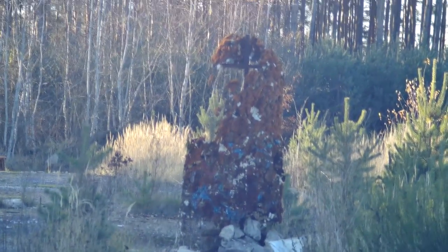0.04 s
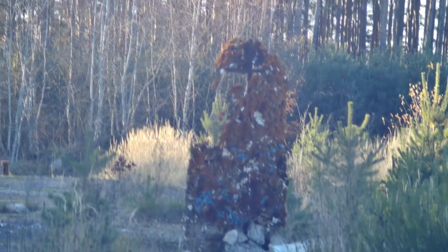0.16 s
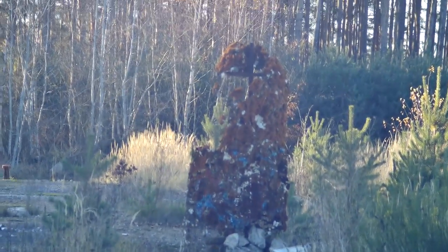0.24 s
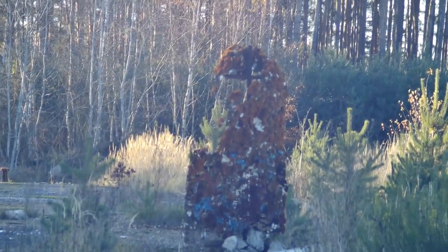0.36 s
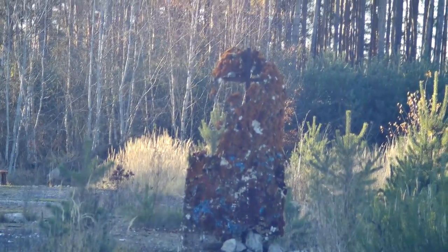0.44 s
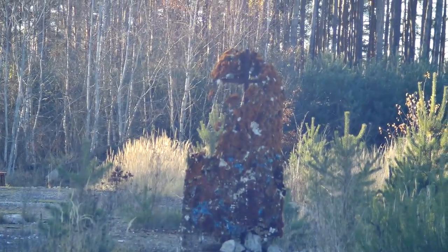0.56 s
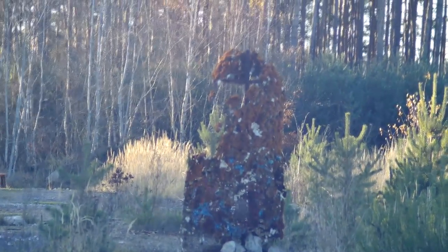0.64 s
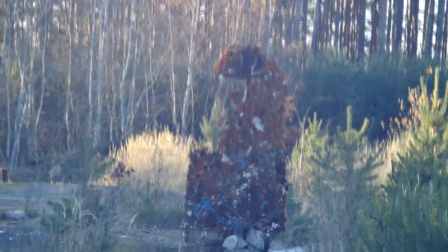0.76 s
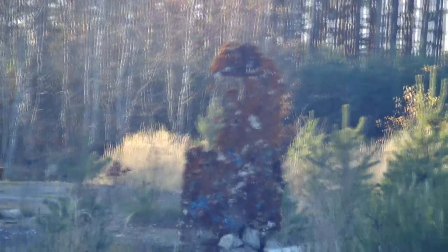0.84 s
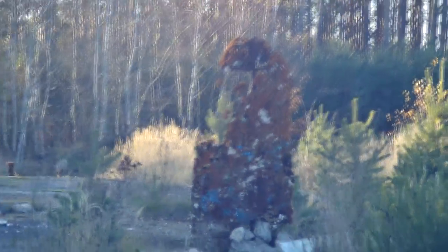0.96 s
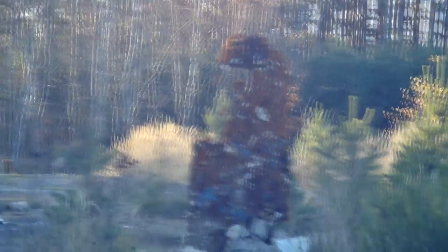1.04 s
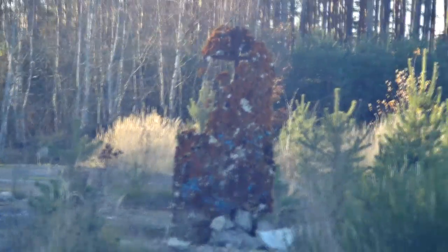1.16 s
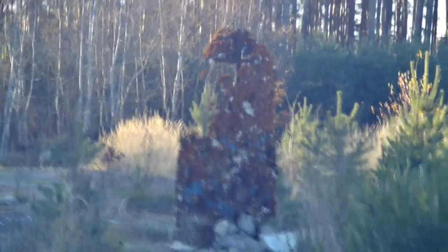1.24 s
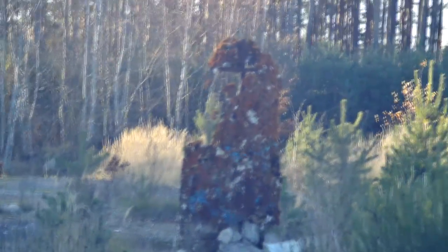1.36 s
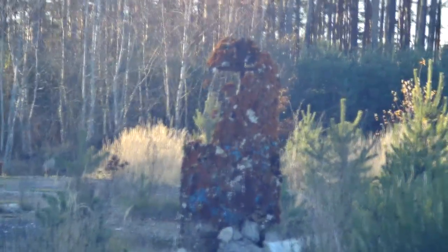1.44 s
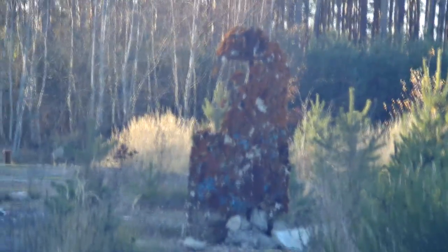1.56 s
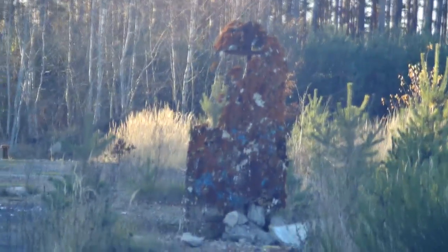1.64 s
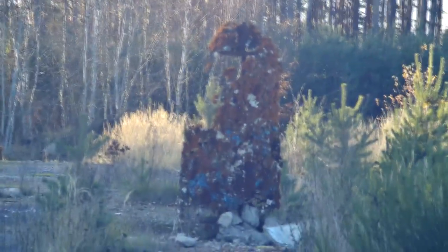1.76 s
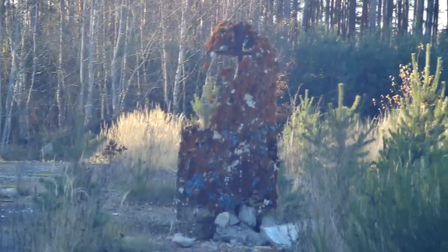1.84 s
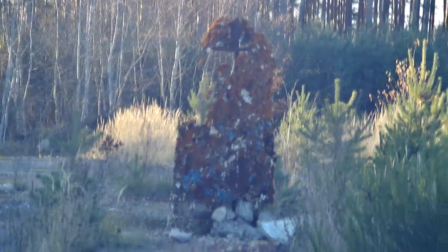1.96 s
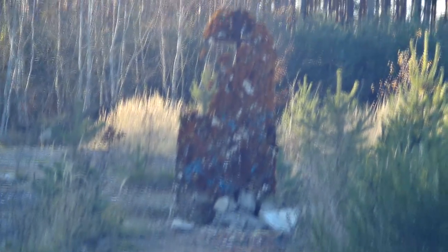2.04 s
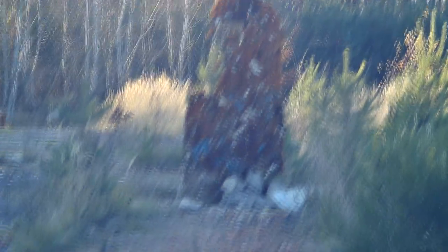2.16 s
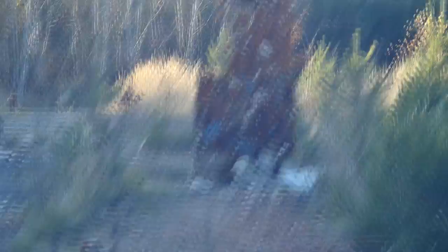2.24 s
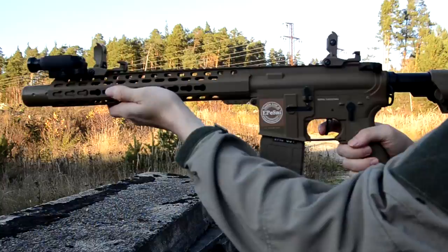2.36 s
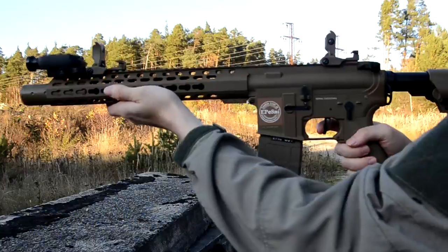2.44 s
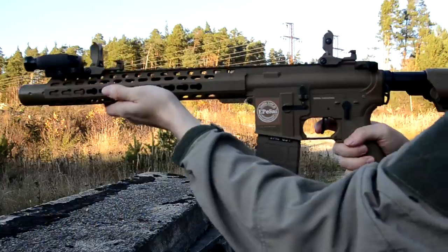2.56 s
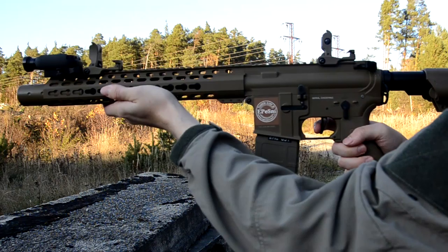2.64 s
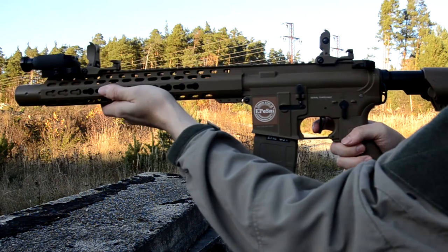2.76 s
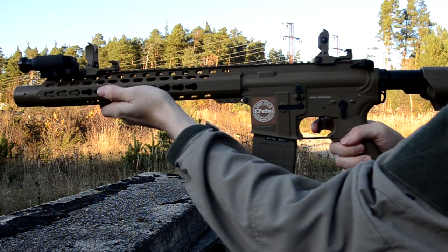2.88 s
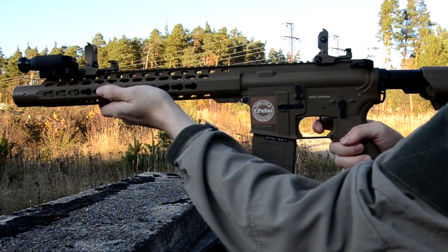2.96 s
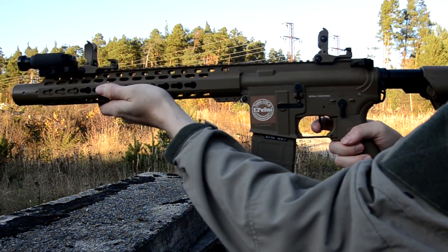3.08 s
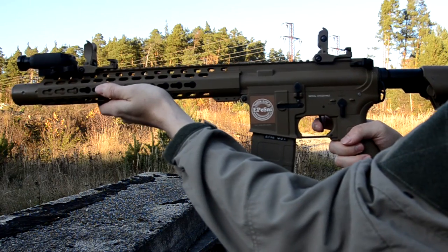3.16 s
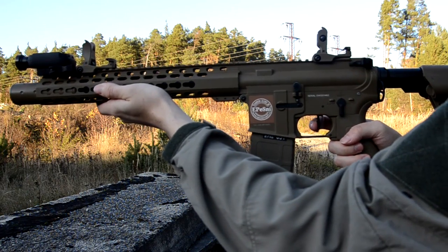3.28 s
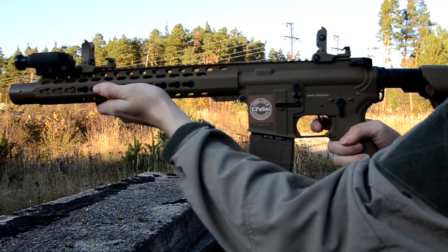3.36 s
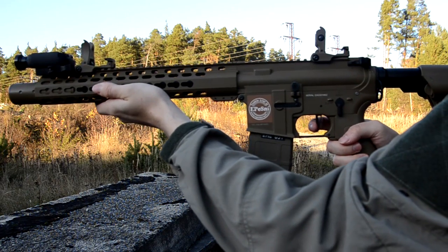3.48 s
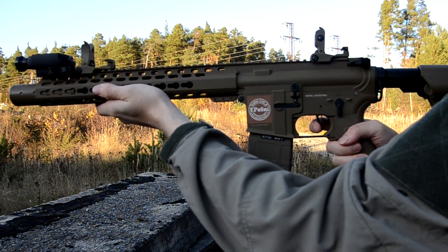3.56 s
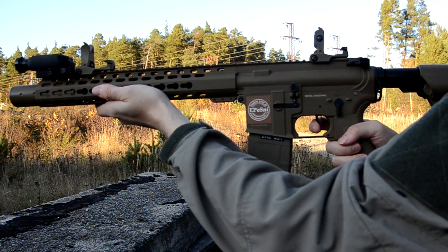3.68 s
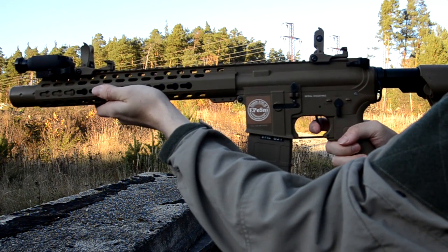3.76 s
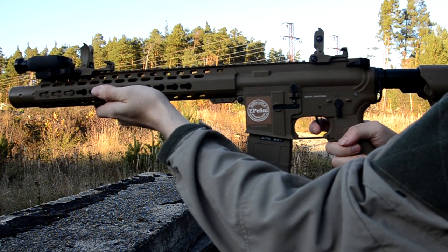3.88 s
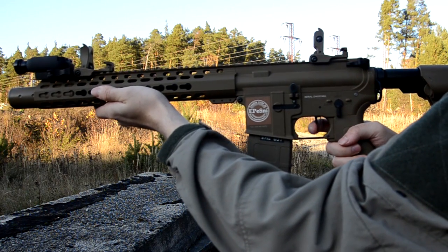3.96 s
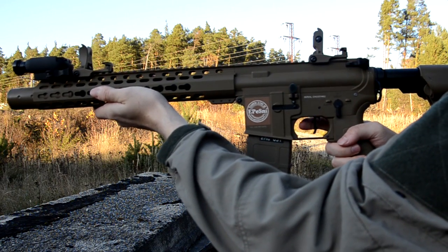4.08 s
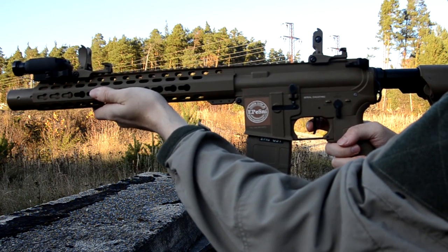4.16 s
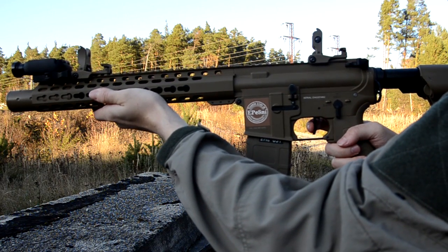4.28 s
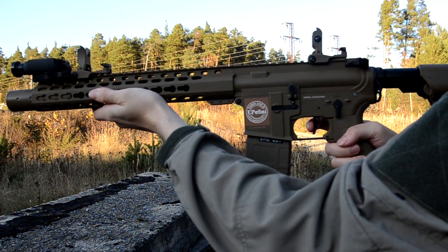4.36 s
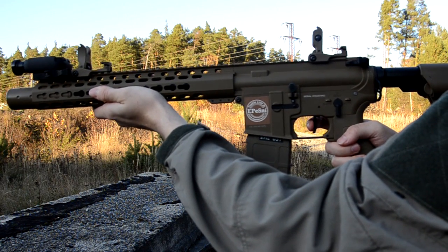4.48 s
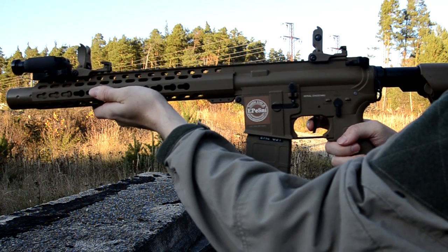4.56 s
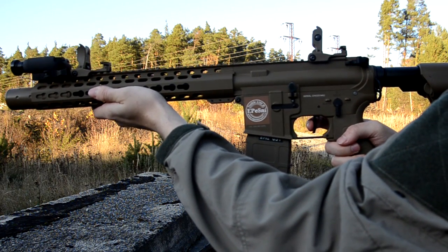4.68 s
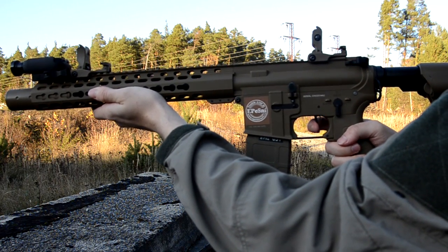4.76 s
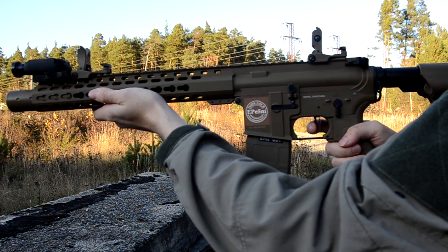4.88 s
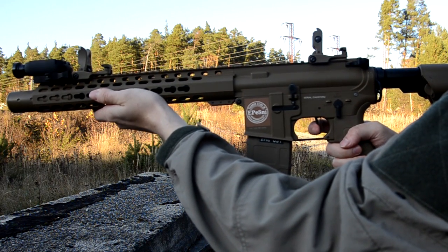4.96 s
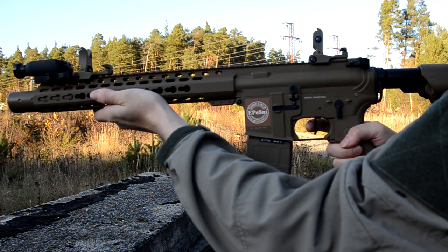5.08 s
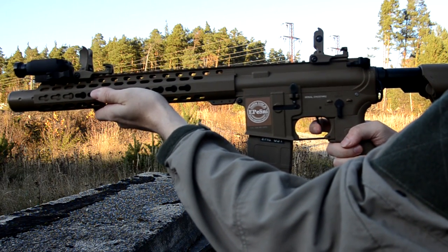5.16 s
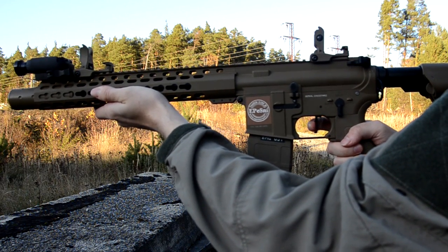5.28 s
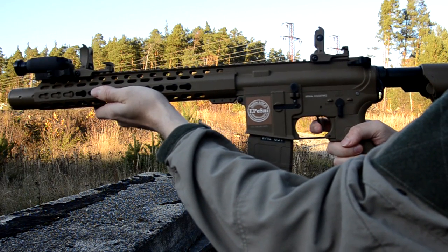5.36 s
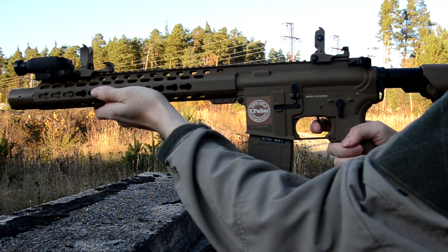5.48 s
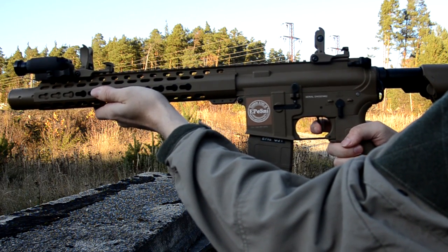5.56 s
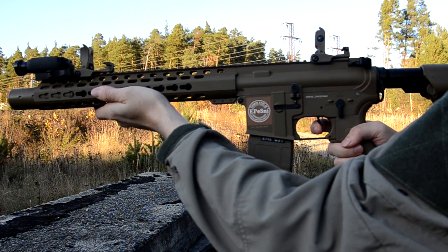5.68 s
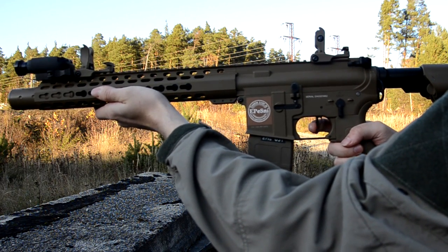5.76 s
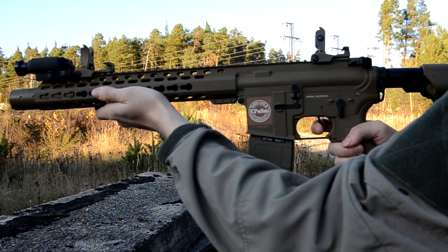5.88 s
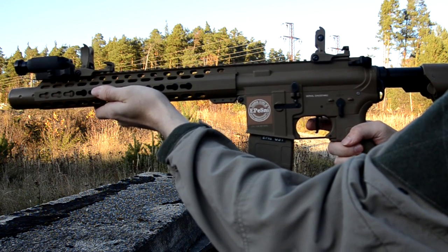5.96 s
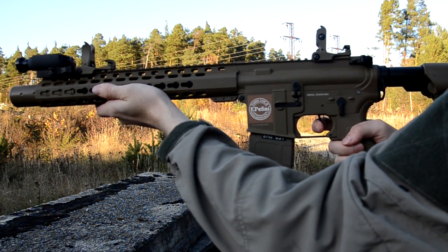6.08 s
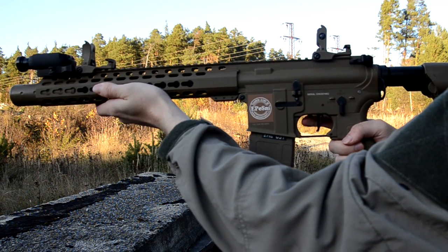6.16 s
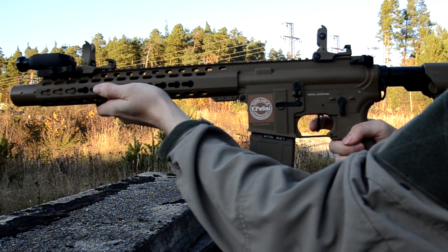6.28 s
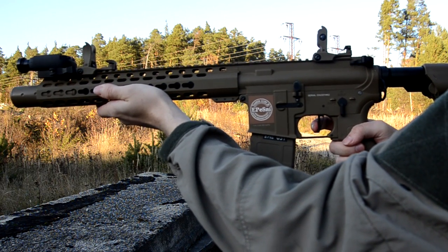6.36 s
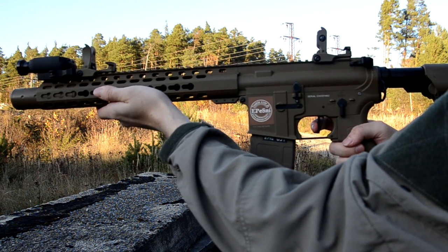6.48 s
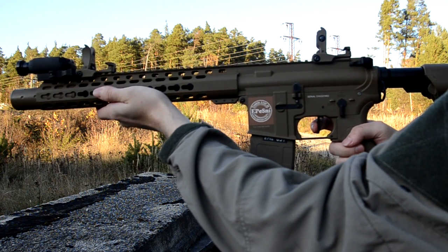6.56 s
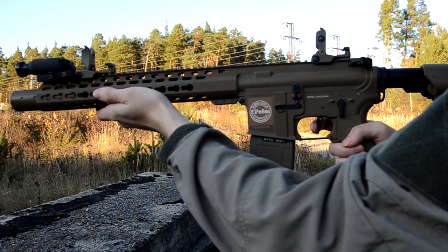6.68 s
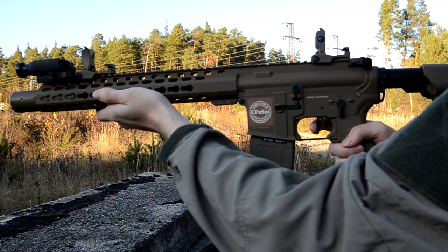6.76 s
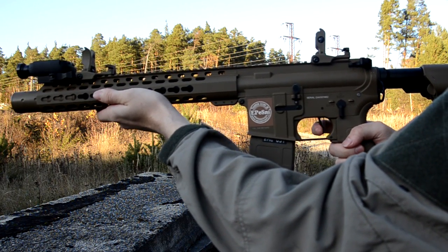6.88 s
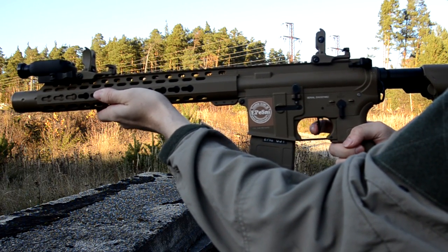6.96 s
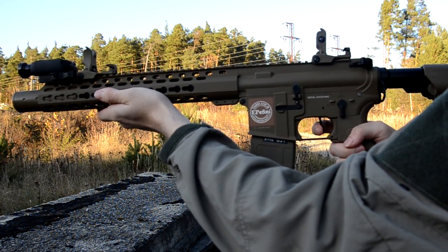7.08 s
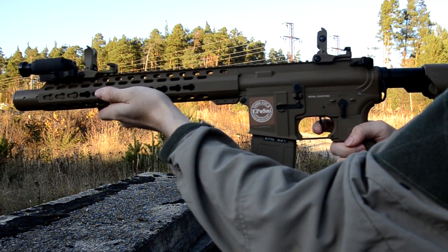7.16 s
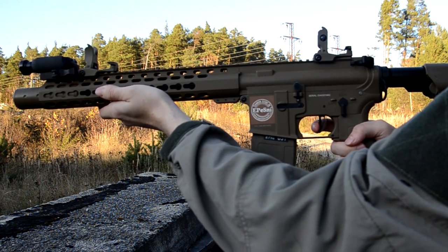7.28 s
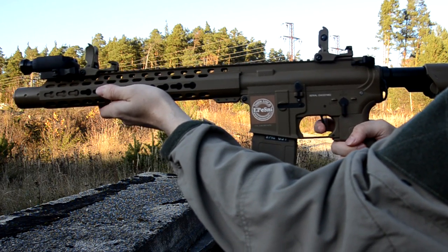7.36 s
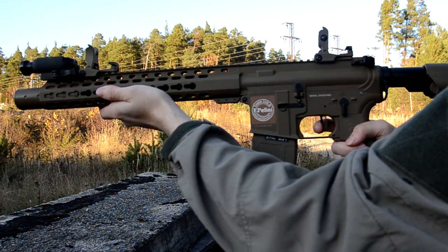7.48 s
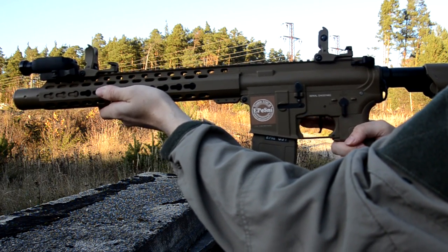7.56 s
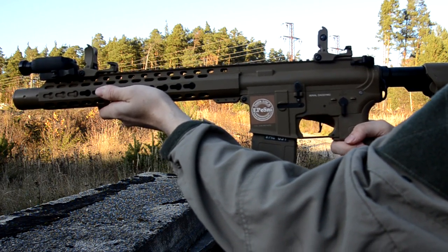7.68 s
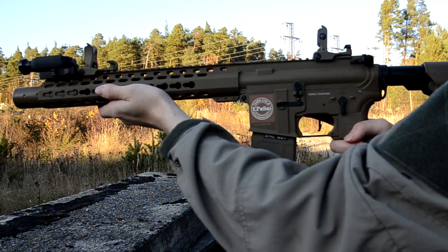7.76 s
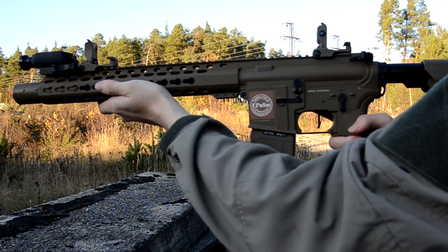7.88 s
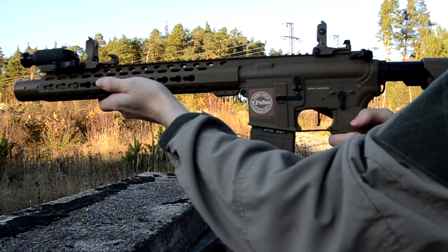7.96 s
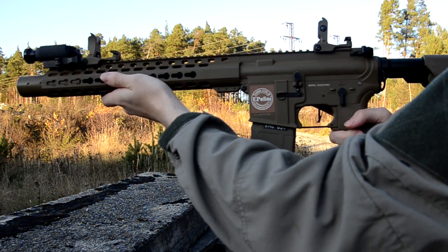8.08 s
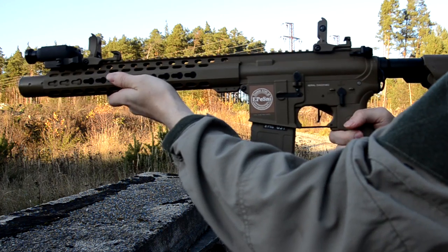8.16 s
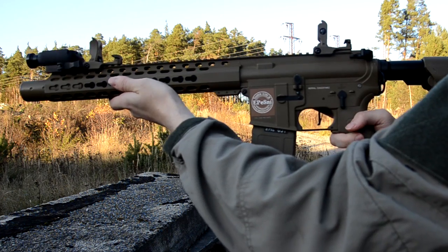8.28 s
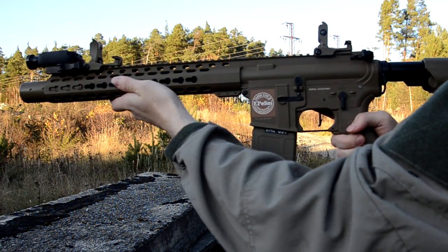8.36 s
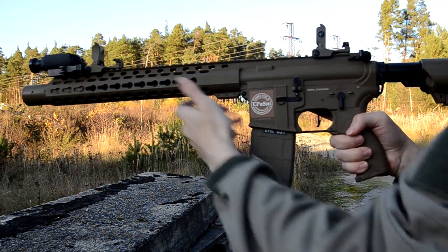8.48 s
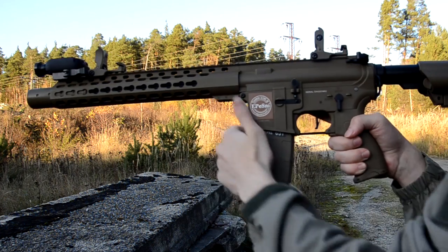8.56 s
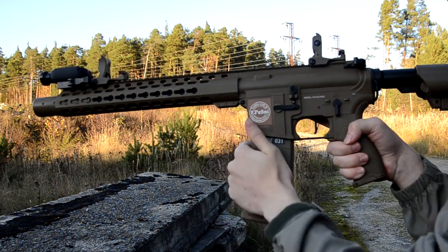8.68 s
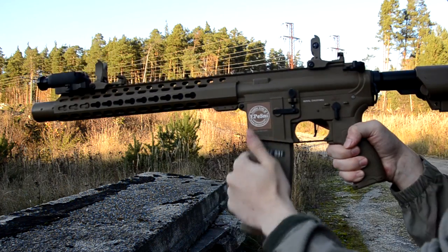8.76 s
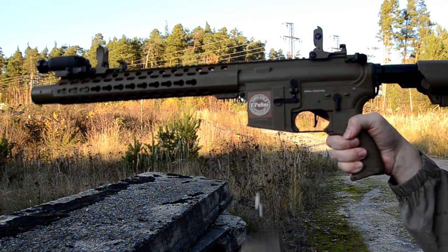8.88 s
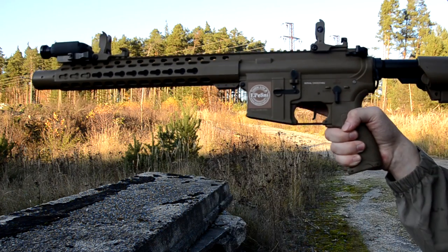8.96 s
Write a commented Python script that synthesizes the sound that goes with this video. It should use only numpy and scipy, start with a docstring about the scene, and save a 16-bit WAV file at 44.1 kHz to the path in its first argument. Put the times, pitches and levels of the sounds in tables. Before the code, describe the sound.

An electric airsoft rifle fires a rapid burst, then strings of single shots with whining gears and sharp piston cracks, ending in handling clacks.

```python
"""An electric airsoft rifle fires one full-auto burst on open ground, and pellets tick on far steel.
Then, heard from beside the gun, come three strings of single shots, the last one empty, and a few
handling clacks. In each cycle the motor winds the spring through whining gears, the piston slams home
with a puff of air and the nozzle snaps back. Trees return a dull tail over faint outdoor air."""
import sys
import numpy as np
from scipy import signal
from scipy.fft import rfft, irfft
from scipy.io import wavfile

SR = 44100
rng = np.random.default_rng(int(sys.argv[2]) if len(sys.argv) > 2 else 0)


def log_audio(samples):
    """Write samples as a 16-bit WAV file to the path given in sys.argv[1]."""
    # one column per channel
    frames = np.atleast_2d(samples).T
    # limit to full scale, then quantise
    limited = np.clip(frames, -1, 1)
    pcm = np.round(limited * 32767).astype(np.int16)
    wavfile.write(sys.argv[1], SR, pcm)


N = 397782
TIME = np.arange(N) / SR
MOVE_S = 2.36   # the listener moves from the range to the side of the gun
MOTOR_ON_S, MOTOR_OFF_S, RUN_DOWN_S = .602, 1.712, .178   # the motor during the burst
WIND_S, NOZZLE_S = .066, .0338   # single shots: wind-up before the slam, nozzle return after it


def full_auto():
    """The motor runs on, and every turn of the sector gear fires once."""
    k = np.arange(16)
    # the sagging battery drags the beat; the first cycles lag while the motor gathers speed
    cycles_s = .06496 + .00007 * k + .0058 * np.exp(-1.5 * k)
    cycles_s[-1] += .0084   # the trigger is let go
    times = .6595 + np.r_[0, np.cumsum(cycles_s)]
    accent_db = 4 * np.exp(-(times - times[0]) / .34)   # the first shots kick hardest
    burst = burst_motor(times) - burst_piston(times, accent_db) + burst_nozzle(times, accent_db)
    return cut(burst, 13600, "low", order=4)


# Piston contacts in one burst cycle: (delay [s], level [dB], low-pass [Hz])
BURST_CONTACTS = [(-.0092, 1.5, 816), (-.004, -25, 900), (-.0007, -11.5, 5180), (0, 0.5, 14000),
                  (.0025, -8, 902)]
# EQ of the piston's crack: (frequency [Hz], level [dB])
BURST_CRACK_EQ = [(120, -31), (200, -10), (548, 4), (1480, -9.5), (1980, -3.5), (2330, -11), (3100, -7),
                  (4430, -5), (5230, -16), (7000, -18), (10100, -23), (11300, -40), (13300, -37),
                  (16000, -71)]
# EQ of the low puff of air: (frequency [Hz], level [dB])
BURST_PUFF_EQ = [(15, -45.5), (25, -18), (102, 1.5), (127, -1), (172, -10), (204, -2.5), (246, -16),
                 (332, -2), (400, -12), (520, -51), (880, -120)]


def burst_piston(times, accent_db):
    """The piston lands with a crack, a hard tick of its head and a puff of air."""
    heavy = np.arange(len(times)) == 1   # the second shot lands dull and heavy
    crack = slams(times, .5 * accent_db - 4 * heavy, BURST_CONTACTS, t60=.009, alike=.91)
    tick = knocks(times, accent_db - 16 - 8 * heavy, chatter_db=-3.5, t60=.004)
    puff = knocks(times - .0078, accent_db + 3, chatter_db=-38.5, t60=.01)
    return colour(crack, BURST_CRACK_EQ) + cut(tick, 4000, "high") + colour(puff, BURST_PUFF_EQ)


# EQ of the nozzle's clack: (frequency [Hz], level [dB])
NOZZLE_EQ = [(120, -44), (200, -13.5), (722, 8.5), (1710, -6.5), (2510, -9.5), (3070, -16.5), (6050, -11),
             (8740, -17), (13300, -47), (16000, -30)]


def burst_nozzle(times, accent_db):
    """Between shots the nozzle snaps back and the next pellet rattles into the feed."""
    lag_s = .0038 * np.exp(-(times[:-1] - times[0]) / .027)   # the motor is still gathering speed
    snap_at = times[:-1] + .0168 + lag_s
    jolt = knocks([MOTOR_ON_S + .0086], [-11], chatter_db=11, t60=.032)   # the gears take up slack
    snaps = knocks(snap_at, accent_db[:-1] - 1, chatter_db=-3, t60=.029, alike=.65)
    # the heavy second shot thuds through the gearbox
    thud = colour(knocks([times[1] - .001, snap_at[1]], [5.5, 0], chatter_db=1.5, t60=.022), NOZZLE_EQ)
    feed_at = snap_at + rng.normal(.0081, .0034, len(snap_at))
    feed = knocks(feed_at, rng.normal(-9.5, 1.83, len(snap_at)), chatter_db=24.5, t60=.068)
    return colour(snaps + jolt, NOZZLE_EQ) + cut(thud, 2070, "low") + cut(feed, 5300, "high")


# Partials of the gear whine in the burst: (multiple of tooth rate, level [dB])
BURST_WHINE = [(.48, -12), (.72, -8), (1, -3), (2, -7.5), (3, -12), (4.15, -9.5)]
# EQ of the running gearbox: (frequency [Hz], level [dB])
BURST_GEAR_EQ = [(180, -42), (330, -12), (680, -3.5), (961, -4.5), (1180, 0), (1400, -3), (1780, -11),
                 (2400, -8.5), (2880, -5.5), (3580, -18), (4300, -10.5), (5200, -17.5), (5830, -5),
                 (6620, -13.5), (13100, -31.5), (15200, -25.5), (16000, -67.5)]
# Resonances of the motor housing: (frequency [Hz], level [dB], t60 [s])
HOUSING_MODES = [(4600, -39.5, .01), (5960, -39.5, 0.015), (7340, -33.5, 0.014), (10500, -37, .008),
                 (12530, -34.5, .007), (13300, -28, .006)]


def burst_motor(times):
    """The motor runs up, draws the spring once a cycle and runs down; its brushes sizzle in the housing."""
    turn_at = np.r_[2 * times[0] - times[1], times, times[-1] + RUN_DOWN_S]
    cycle = np.interp(TIME, turn_at, np.arange(len(turn_at))) % 1
    running_s = np.maximum(TIME - MOTOR_ON_S, 0)
    speed = (1 - np.exp(-running_s / .012)) * np.clip(1 - (TIME - MOTOR_OFF_S) / RUN_DOWN_S, 0, 1)
    tooth_hz = 1407.3 * speed * (1 + .0612 * np.cos(2 * np.pi * (cycle - .444)))
    tooth_hz *= 1 + .02 * flutter(N, rate_hz=25)   # no two cycles load the motor alike
    drawing = np.clip(np.minimum(cycle - .19, .66 - cycle) / .059, 0, 1)
    fresh_battery_db = 5.5 * np.exp(-running_s / .14)
    drive = amp(-30.5 + 2.5 * drawing + fresh_battery_db) * speed ** 1.92
    # the teeth press only while they wind the spring; after the last shot they run loose
    pressure = .44 * np.sin(np.pi * cycle ** 2) * (TIME < times[-1])
    teeth = gears(tooth_hz, BURST_WHINE, bite=.74, wobble=.198, stumble=.01, pressure=pressure)
    whirr = amp(-6.5) * colour(teeth * drive, BURST_GEAR_EQ)
    brushes = amp(1) * cut(rng.standard_normal(N), 8000, "low", order=1) * drive
    return whirr + ringing(whirr + brushes, HOUSING_MODES)


# Single-shot cues, the piston's landing and the motor's starting jolt: (time [s], level [dB])
SHOT_CUES = [(3.0599, -29.5), (3.2584, -35), (3.4239, -52.5), (3.6, -53), (3.7787, -33.5), (3.9571, -36.5),
             (4.8526, -28), (5.044, -45.5), (5.2330, -44), (5.4109, -45), (5.5815, -43), (5.7541, -53.5),
             (5.9235, -44.5), (6.1104, -37.5), (6.9003, -39.5), (7.087, -52), (7.2700, -36), (7.4464, -52)]


def single_shots():
    """Every shot is a whole cycle from rest: wind-up, slam, coast and latch."""
    times, jolt_db = np.transpose(SHOT_CUES)
    whirr = shot_motor(times, jolt_db)
    force_db = rng.normal(0, .48, len(times))
    empty = times > 6.5
    cycle_at = times + .0022 * empty   # with no pellet to cushion it, the piston lands ahead of the gears
    return (whirr - shot_piston(times, force_db) + shot_barrel(cycle_at, empty)
            + shot_action(times, cycle_at, force_db, jolt_db))


# Piston contacts in a single shot: (delay [s], level [dB], low-pass [Hz])
SHOT_CONTACTS = [(-.0103, -1.5, 884), (-.0074, 4.5, 1205), (-.0041, 4, 1457), (-.002, 1.5, 5480),
                 (-.0002, 2.5, 12020), (.0058, -8, 4000)]
# EQ of the close crack: (frequency [Hz], level [dB])
SHOT_CRACK_EQ = [(88, -30.5), (150, -7.5), (730, -1), (1790, -5), (2550, -9.5), (3290, -3), (4000, -17),
                 (4580, -15), (6140, -19.5), (6910, -19.5), (8400, -29), (12900, -25.5), (16000, -41)]


def shot_piston(times, force_db):
    """The piston cracks home; its head ticks on the cylinder and claps against the cylinder head."""
    crack = colour(slams(times, force_db, SHOT_CONTACTS, t60=.018), SHOT_CRACK_EQ)
    tick = knocks(times, force_db - 14, chatter_db=1.5, t60=.003)
    clap = knocks(times, force_db - 3, chatter_db=-.5, t60=.003)
    return crack + band(tick, 5000, 13000) + band(clap, 2800, 4400, top_order=4)


# EQ of the close puff of air: (frequency [Hz], level [dB])
SHOT_PUFF_EQ = [(21, -33.5), (59, -17.5), (139, -3), (214, -3.5), (252, -24), (305, -4), (370, -13.5),
                (460, -46), (770, -120)]
# Hollow resonances of the barrel: (frequency [Hz], level [dB], t60 [s])
BARREL_MODES = [(185, -31, .04), (330, -31.5, 0.045), (425.7, -28.5, 0.038), (620, -28.5, 0.057),
                (800, -31, 0.059)]


def shot_barrel(times, empty):
    """Air puffs out of the barrel; an empty shot has less puff and more ring."""
    puff = knocks(times - .0098, np.where(empty, -6, 1.5), chatter_db=-9, t60=.05)
    kick = knocks(times - .004, np.where(empty, 8.5, -8), chatter_db=-3.5, t60=.0067)
    return colour(puff, SHOT_PUFF_EQ) + ringing(kick, BARREL_MODES)


# Partials of the gear whine in a single shot: (multiple of tooth rate, level [dB])
SHOT_WHINE = [(.6, -13), (1, -11), (1.5, -15), (2, -9.5), (3, -7), (3.6, -14), (4, -13), (5, -9)]
# EQ of the gears winding up: (frequency [Hz], level [dB])
WIND_EQ = [(150, -42), (400, -24.5), (550, -4.5), (698, -11), (890, -3.5), (1030, -9.5), (1400, -5),
           (1830, -13), (2020, -11), (2400, -10), (2820, -5.5), (3300, -9), (4490, -17), (5350, -22.5),
           (11300, -33.5), (14900, -36.5), (16000, -51)]
# EQ of the gears coasting: (frequency [Hz], level [dB])
COAST_EQ = [(150, -41.5), (250, -24), (629, -6), (906, -6), (1140, 1), (1610, -6), (1790, -2.5), (2530, -8),
            (3230, -0.5), (3650, -6), (5440, -17.5), (6820, -16), (9330, -24), (13700, -20), (16000, -36.5)]


def shot_motor(times, jolt_db):
    """The gears zip up into each shot and whirr down after it."""
    winding, coasting = np.zeros(N), np.zeros(N)
    for s, db in zip(times, jolt_db):
        add(winding, s - WIND_S, wind_up(db, SHOT_WHINE))
        add(coasting, s, coast(SHOT_WHINE))
    return amp(-8) * colour(winding, WIND_EQ) + amp(-7.5) * colour(coasting, COAST_EQ)


def wind_up(jolt_db, partials):
    """From rest the gears climb in pitch and swell as the spring tightens, until the piston is let go."""
    start_hz, top_hz, let_go_s, release_db_per_s = 171, 1003.3, .008, 2503
    t = TIME[:int((WIND_S + let_go_s) * SR)]
    tooth_hz = top_hz + (start_hz - top_hz) * np.exp(-t / .021)
    load = amp(jolt_db) + (amp(-19.5) - amp(jolt_db)) * np.minimum(t / .029, 1) ** 1.6
    engage = np.minimum(1, t / .0087)   # the teeth take up their slack
    release = amp(-release_db_per_s * np.maximum(t - WIND_S + let_go_s, 0))
    wander = np.interp(t / .0073, np.arange(32), rng.normal(1, .03, 32))
    return engage * load * release * gears(tooth_hz * wander, partials, bite=1, wobble=.34)


def coast(partials, stop_s=.135, start_hz=927):
    """The gears run free, meet the spring again as the nozzle snaps back, and brake to a stop."""
    t = TIME[:int(stop_s * SR)]
    speed = 1 - (t / stop_s) ** 2
    load = amp(np.where(t < NOZZLE_S, -36.5, -29)) * speed ** 1.67
    return load * gears(start_hz * speed, partials, bite=1, wobble=1.5)


def gears(tooth_hz, partials, bite, wobble, stumble=.018, pressure=1):
    """Uneven teeth mesh: a rattle that peaks at every tooth, and under pressure a flickering whine."""
    count, grind_hz = len(tooth_hz), 220
    unsteady = wobble * rng.standard_normal(count) + stumble * flutter(count, grind_hz)
    phase = 2 * np.pi * (np.cumsum(tooth_hz * (1 + unsteady)) / SR + rng.random())
    rattle = rng.standard_normal(count) * np.exp(bite * np.cos(phase)) * amp(2 * flutter(count, grind_hz))
    whine = sum(amp(db + 3.5 * flutter(count, rate_hz=45)) * np.sin(k * phase + 2 * np.pi * rng.random())
                for k, db in partials)
    return rattle / np.std(rattle) + pressure * whine


# EQ of small parts knocking in the gearbox: (frequency [Hz], level [dB])
ACTION_EQ = [(110, -38.5), (180, -20.5), (555, -5), (1220, -2.5), (1450, -3.5), (1750, -8), (2110, -12),
             (3180, -5), (3840, -17.5), (4900, -24), (5280, -25), (9640, -41), (13800, -37), (16000, -53)]


def shot_action(times, cycle_at, force_db, jolt_db):
    """Small parts click around each shot: trigger, starting jolt, nozzle, pellet feed and latch."""
    nozzle = knocks(cycle_at + NOZZLE_S, force_db - 3, chatter_db=13.5, t60=.017, alike=1)
    slip = knocks(times - .009, force_db - 18.5, chatter_db=13, t60=.008)   # last tooth leaves the piston
    feed_at = np.r_[times + .048, times + .065] + rng.normal(0, .0029, 2 * len(times))
    feed = knocks(feed_at, rng.normal(-23.5, 2, len(feed_at)), chatter_db=17.5, t60=.04)
    jolts = knocks(times - WIND_S + .0051, jolt_db + 28, chatter_db=19, t60=.05)
    string_at = times[np.diff(times, prepend=0) > .5]
    trigger = knocks(string_at - WIND_S - .016, np.full(len(string_at), -27), chatter_db=8, t60=.031)
    snag = knocks([6.8595], [5], chatter_db=12, t60=.025)   # a tooth snags in the first empty wind-up
    body = cut(nozzle, 3400, "low") + jolts + trigger + snag + latch()
    return colour(body, ACTION_EQ) + band(slip + feed, 7000, 13500, top_order=4)


# Latch clicks: (time [s], level [dB])
LATCH_CUES = [(3.147, -14.5), (3.34, -17.5), (3.505, -17.5), (3.69, -14), (4.049, -14), (5.15, -14.5),
              (5.329, -12.5), (5.492, -18), (5.668, -13.5), (6.005, -19), (6.204, -10.5), (7.185, -14),
              (7.361, -18), (7.538, -15.5)]


def latch():
    """The anti-reversal latch catches, bounces, and catches again softly as the gears rock back."""
    times, levels_db = np.transpose(LATCH_CUES)
    click = knocks(times + .001, levels_db + 12.5, chatter_db=6, t60=.027)
    bounce = knocks(times + .0036, levels_db + 8.5, chatter_db=13.5, t60=.035)
    recatch = knocks(times + .019, levels_db + 3, chatter_db=13, t60=.023)
    return click + bounce + recatch


# Handling clacks: (time [s], level [dB], pitch [Hz], high-pass [Hz], rattle t60 [s])
CLACK_CUES = [(8.6055, -17.5, 3930, 1200, 0.038), (8.628, -27, 1500, 700, 0.046),
              (8.635, -12, 3440, 1000, 0.039), (8.6385, -12, 3620, 900, .03), (8.6422, -13, 3500, 855, .05),
              (8.648, -15.5, 3300, 700, 0.069), (8.7744, -8.5, 870, 400, 0.048),
              (8.793, -11, 850, 350, 0.13), (8.806, -19, 3000, 600, 0.072), (8.812, -18, 1140, 300, .06),
              (8.8214, -12.5, 1270, 280, 0.046), (8.8257, -11, 1350, 350, .05),
              (8.9382, -6, 2200, 1120, 0.028)]
# EQ shared by the clacks: (frequency [Hz], level [dB])
CLACK_EQ = [(120, -40), (200, -12), (380, -2.5), (709, -8.5), (1100, 1), (1680, -9), (3190, -7.5),
            (4950, -24), (10700, -36.5), (16000, -45)]


def handling():
    """Catches and loose parts clack as the grip changes, each at its own pitch and with one rebound."""
    clacks, snaps = np.zeros(N), np.zeros(N)
    rebounds = [(s + .006, db - 15, *rest) for s, db, *rest in CLACK_CUES]
    for s, db, pitch_hz, low_hz, rattle_s in CLACK_CUES + rebounds:
        clack = dying_noise(t60=rattle_s)
        contact = dying_noise(t60=.01)
        clack[:len(contact)] += contact
        body = signal.lfilter(*signal.iirpeak(pitch_hz, 4, fs=SR), clack)
        rattle = band(clack, low_hz, 2.6 * pitch_hz, top_order=1)
        add(clacks, s, amp(db) * (rattle + amp(.5) * body))
        add(snaps, s, amp(db - 30) * pitch_hz / 3000 * contact)   # small hard parts snap in the treble
    return colour(clacks, CLACK_EQ) + band(snaps, 3500, 8800)


# Contacts of the magazine catch: (time [s], level [dB])
CATCH_CUES = [(8.9374, -17), (8.9374, -4), (8.9398, -7), (8.942, -8), (8.954, -19)]
# Resonances of the catch: (frequency [Hz], level [dB], t60 [s])
CATCH_MODES = [(1249, -39, 0.027), (2160, -38, .014), (2420, -30, .012), (3870, -31, .012),
               (4350, -29, 0.013)]


def magazine_catch():
    """The catch springs back: a quick run of hard contacts sets its small steel parts ringing."""
    clicks = knocks(*np.transpose(CATCH_CUES), chatter_db=0, t60=.004)
    return ringing(clicks, CATCH_MODES) + amp(-17) * band(clicks, 3000, 10500, top_order=6)


# Long resonances of the gun's metal: (frequency [Hz], level [dB], t60 [s])
METAL_MODES = [(991, -67, .55), (1168, -77, .7), (1297, -77, .7), (1976, -69, .6), (2046, -72, 1.6),
               (2455, -68, .35), (3070, -76, .6), (3280, -77, .5)]
# Knocks that leave the spring ringing: (time [s], level [dB], tilt [dB/octave])
SPRING_CUES = [(4.049, 20.5, -6), (6.205, 4.5, 7), (7.538, 13, -9), (8.939, 14, -4)]


def metal_ring(impacts):
    """Impacts ring in the gun's metal, and the spring sings on after each string and the last catch."""
    out = ringing(impacts, METAL_MODES)
    lowest_hz = METAL_MODES[0][0]
    for s, db, tilt in SPRING_CUES:
        click = np.zeros(N)
        add(click, s, [amp(db)])
        modes = [(hz, level + tilt * np.log2(hz / lowest_hz), t60) for hz, level, t60 in METAL_MODES]
        out += ringing(click, modes)
    return out


# Pellet hits on the target: (time [s], level [dB])
PELLET_CUES = [(1.871, -32), (1.935, -42), (2.001, -35), (2.064, -37.5), (2.13, -36.5), (2.206, -40.5),
               (2.216, -39.5), (2.63, -49)]
# EQ of the distant ticks: (frequency [Hz], level [dB])
PELLET_EQ = [(150, -18), (250, 1.5), (1030, -9.5), (1710, 0), (2730, -5), (4760, -8), (7510, -19),
             (10500, -25.5), (14000, -54)]
# Resonance of the steel plate: (frequency [Hz], level [dB], t60 [s])
PLATE_MODES = [(663, -53.5, 8.5)]


def target():
    """The last pellets of the burst land on the far steel plate after the gun has stopped firing."""
    times, levels_db = np.transpose(PELLET_CUES)
    ticks = colour(knocks(times, levels_db + 14, chatter_db=33, t60=.025), PELLET_EQ)
    plate = ringing(knocks(times, levels_db + 15, chatter_db=-30, t60=.002), PLATE_MODES)
    fade = np.interp(TIME, [MOVE_S, MOVE_S + .41], [1, 0])
    return ticks + plate * fade + forest(ticks, level_db=-9, t60=.69, top_hz=5000)


def forest(x, level_db, t60, top_hz):
    """Scrub and the tree line scatter back a faint, dull tail."""
    tail = signal.oaconvolve(x, dying_noise(t60))[:N]
    return amp(level_db) * band(tail, 510, top_hz)


# EQ of the air on the range: (frequency [Hz], level [dB])
RANGE_AIR_EQ = [(12, -56), (20, -2), (193, -16), (388, -26), (660, -24.5), (1000, -30), (3000, -26),
                (3700, -32), (8650, -43), (16000, -47.5)]
# EQ of the air beside the gun: (frequency [Hz], level [dB])
SIDE_AIR_EQ = [(12, -53.5), (20, -19.5), (60, -3.5), (200, -5), (300, -11.5), (500, -10), (738, -12),
               (1960, -15), (2300, -12), (5230, -27.5), (16000, -38.5)]


def air():
    """A faint outdoor bed, one for each listening place."""
    at_range = amp(-64.5) * colour(rng.standard_normal(N), RANGE_AIR_EQ)
    at_side = amp(-65.5) * colour(rng.standard_normal(N), SIDE_AIR_EQ)
    return np.where(TIME < MOVE_S, at_range, at_side)


def slams(times, levels_db, contacts, t60, alike=0):
    """The piston is released, hits the air cushion and lands: a run of dull and bright contacts."""
    return sum(cut(knocks(times + delay, levels_db + db, chatter_db=.5, t60=t60, alike=alike), hz, "low")
               for delay, db, hz in contacts)


def knocks(times, levels_db, chatter_db, t60, alike=0):
    """Sharp clicks, each trailed by loose parts chattering; the share `alike` repeats on every hit."""
    out, same = np.zeros(N), dying_noise(t60)
    for s, db in zip(times, levels_db):
        knock = amp(chatter_db) * (np.sqrt(alike) * same + np.sqrt(1 - alike) * dying_noise(t60))
        knock[0] += 1
        add(out, s, amp(db) * knock / np.linalg.norm(knock))
    return out


def dying_noise(t60):
    """A decaying burst of noise of unit energy."""
    t = TIME[:int(t60 * SR) + 2]
    burst = rng.standard_normal(len(t)) * np.exp(-np.log(1000) * t / t60)
    return burst / np.linalg.norm(burst)


def ringing(x, modes):
    """Decaying sines set off by x."""
    out = np.zeros(N)
    for hz, db, t60 in modes:
        r, w = amp(-60 / (t60 * SR)), 2 * np.pi * hz / SR
        out += amp(db) * signal.lfilter([0, np.sin(w)], [1, -2 * r * np.cos(w), r * r], x + 1e-18)
    return out


def flutter(count, rate_hz):
    """Smooth random motion with a spread of one."""
    slow = cut(rng.standard_normal(count + 2000), rate_hz, "low")[2000:]
    return slow / np.std(slow)


def colour(x, eq):
    """Minimum-phase EQ with unit power gain: nothing rings ahead of an attack."""
    size = 8192
    hz, db = np.transpose(eq)
    gain = amp(np.interp(np.log(np.arange(size // 2 + 1) * SR / size + 1), np.log(hz), db))
    cepstrum = irfft(np.log(gain))
    cepstrum[1:size // 2] *= 2
    cepstrum[size // 2 + 1:] = 0
    response = irfft(np.exp(rfft(cepstrum)))
    return signal.oaconvolve(x, response / np.linalg.norm(response))[:N]


def cut(x, hz, kind, order=2):
    """Low- or high-pass."""
    return signal.sosfilt(signal.butter(order, hz, kind, fs=SR, output="sos"), x + 1e-18)


def band(x, low_hz, top_hz, top_order=2):
    """Trim the lows, then the top."""
    return cut(cut(x, low_hz, "high"), top_hz, "low", top_order)


def add(out, s, x):
    """Mix x into out from time s on."""
    i = int(round(s * SR))
    out[i:i + len(x)] += x[:N - i]


def amp(db):
    """Decibels to gain."""
    return 10 ** (np.asarray(db) / 20)


def scene():
    """The rifle up front; the tree line, the target and the air behind it."""
    burst, shots, clacks = full_auto(), single_shots(), handling()
    close = shots + clacks + magazine_catch()
    metal = metal_ring(amp(-9) * shots + amp(-14) * clacks)
    echo = forest(close, level_db=-24.5, t60=.58, top_hz=3500)
    echo += forest(burst, level_db=-36.5, t60=.73, top_hz=4000)
    return (burst + close + metal + echo + target() + air())[None]


def record(dry):
    """A soft clip rounds the loudest peaks and a steep low-pass cuts the top."""
    ceiling, top_hz = .4, 15900
    rounded = dry / (1 + (dry / ceiling) ** 6) ** (1 / 6)
    return signal.sosfilt(signal.ellip(10, .1, 80, top_hz, fs=SR, output="sos"), rounded)


dry = scene()
out = record(dry)
log_audio(out)
```